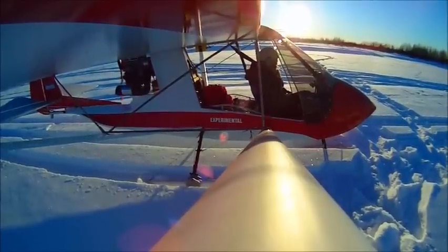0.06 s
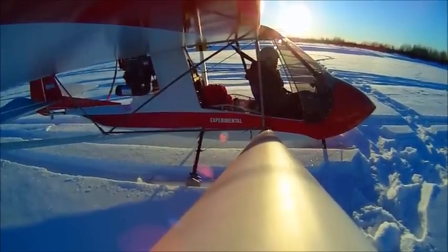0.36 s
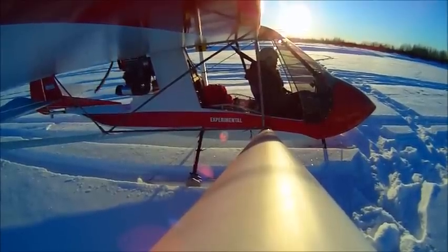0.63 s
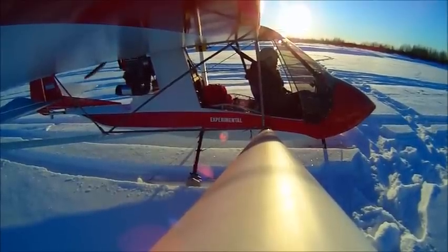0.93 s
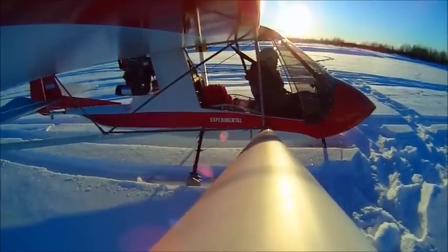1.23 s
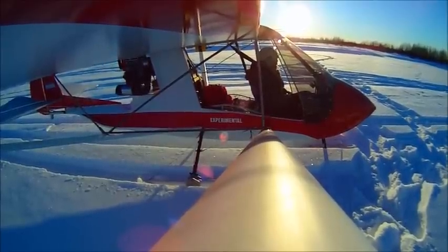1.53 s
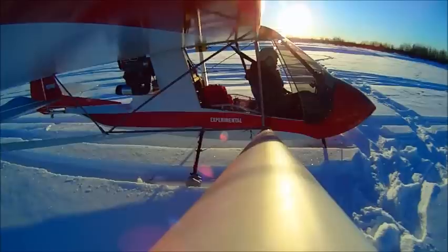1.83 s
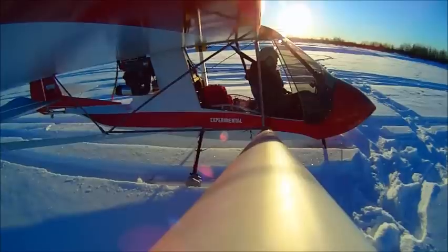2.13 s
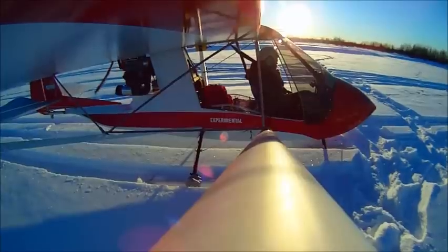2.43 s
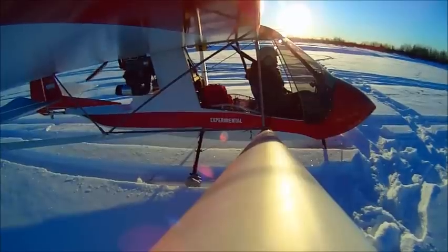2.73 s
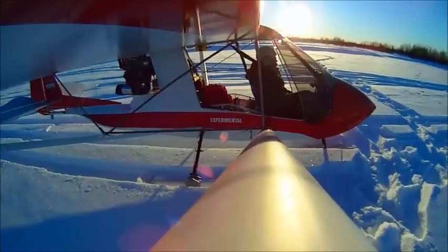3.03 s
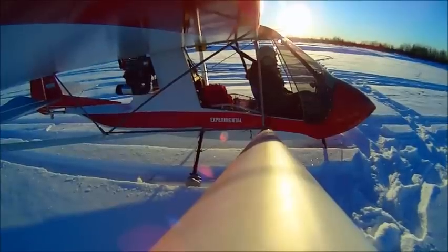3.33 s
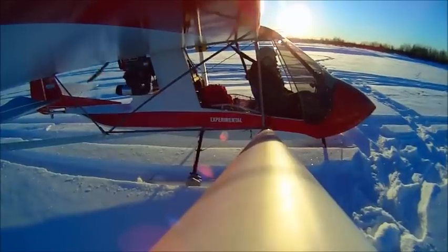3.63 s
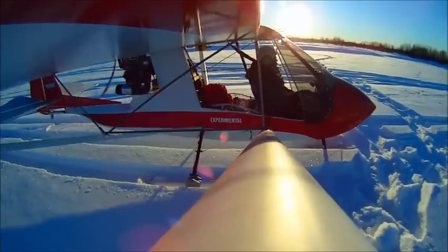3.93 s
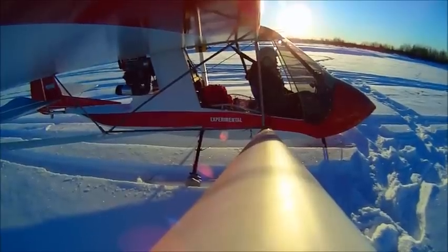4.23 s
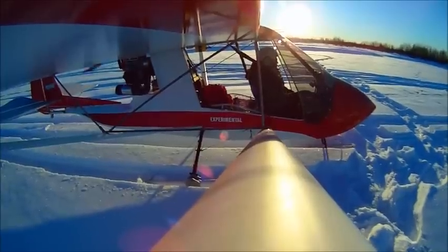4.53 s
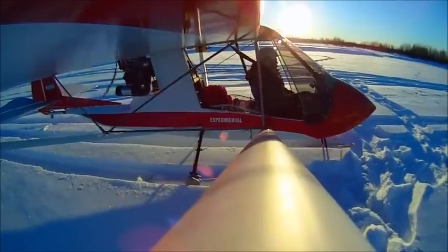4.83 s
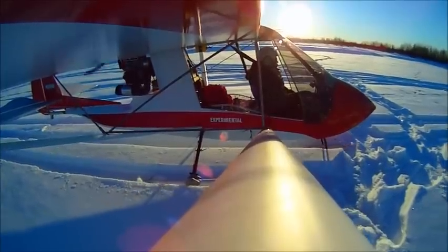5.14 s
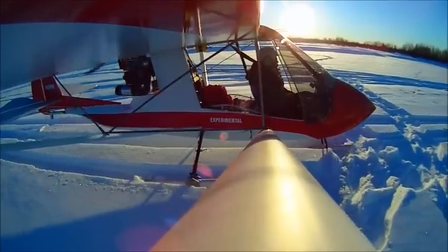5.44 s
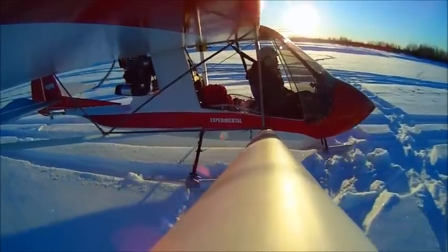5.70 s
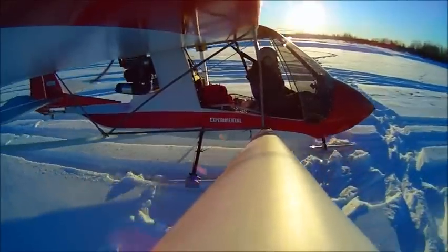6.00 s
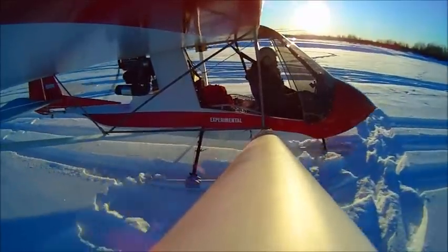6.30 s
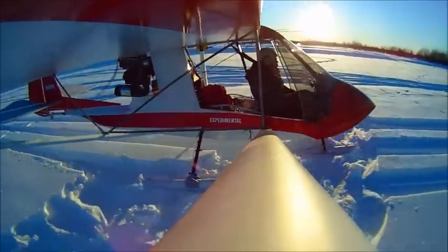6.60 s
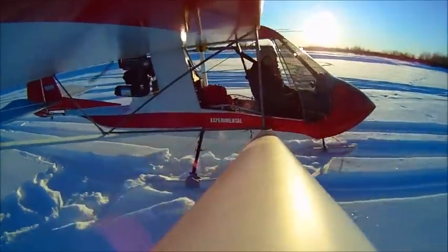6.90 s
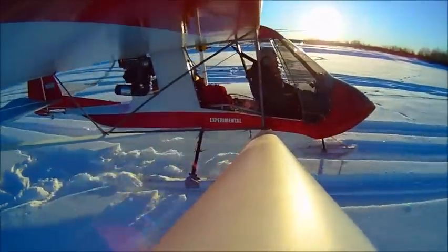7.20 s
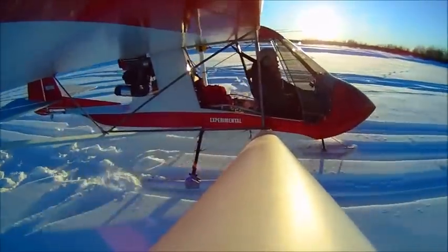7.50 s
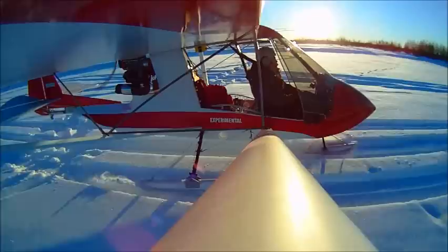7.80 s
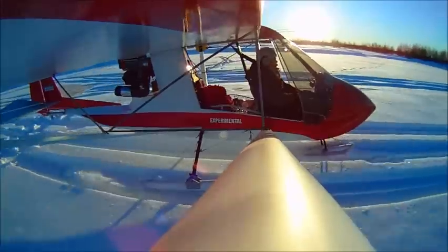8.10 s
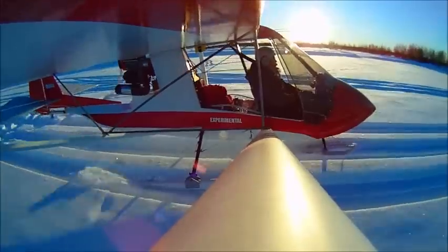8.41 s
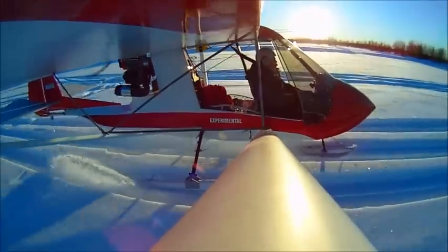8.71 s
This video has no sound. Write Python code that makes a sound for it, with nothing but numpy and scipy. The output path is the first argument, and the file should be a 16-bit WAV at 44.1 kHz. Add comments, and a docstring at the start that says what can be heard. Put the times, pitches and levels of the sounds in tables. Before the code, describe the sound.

Heard from a microphone on the wing strut, a small propeller plane ticks over with an uneven, tinny rattle. The throttle opens and the engine rises in pitch, pauses briefly, then rises again, with a raspy whine and swelling rush of air. Sharp metallic clacks and chatter break out on the way up. It ends in a loud, steady, buzzing drone that rings through the airframe.

```python
"""The two-stroke, two-cylinder engine of an ultralight on skis idles on snow, then revs up to full power.
It turns a two-blade propeller through a whining reduction drive, which makes the blades turn slower.
Engine and blades each give a family of overtones, over the rush of torn air. Everything rings in
the housing of a camera on the wing strut. A loose fitting clacks, and chatters when the shaft or
the blades shake the strut near 75 Hz."""
import sys
import numpy as np
from scipy import signal
from scipy.fft import rfft, irfft, next_fast_len
from scipy.io import wavfile
from scipy.ndimage import uniform_filter1d, map_coordinates

SR = 44100
rng = np.random.default_rng(int(sys.argv[2]) if len(sys.argv) > 2 else 0)


def transcribe(signal):
    """Save signal, clipped to [-1, 1], as a 16-bit WAV file at the path in sys.argv[1]."""
    frames = np.atleast_2d(signal).T
    limited = np.clip(frames, -1, 1)
    pcm = np.round(limited * 32767).astype(np.int16)
    wavfile.write(sys.argv[1], SR, pcm)


N = 385862

FULL_HZ, BLADES_PER_TURN = 101.3, 2 / 2.6  # shaft turns a second at full power; blade passes per turn
OPEN_S, OPEN_TAKES_S = 3.3, 0.56  # the throttle opens once and stays open
UNEQUAL_S, UNEQUAL_TAKES_S = 6.1, .3  # near full power the two cylinders stop firing alike

# Tone colour of the running engine, propeller and air: f/Hz, level/dB
RUN_COLOUR = [(35, -52), (60, -17), (190, -18), (347, -13), (399, -17.5), (564, -14.5), (1050, -10.5),
              (1450, -4), (2650, -18), (2910, -13.5), (5550, -18), (6530, -14.5), (7000, -21),
              (9900, -25.5), (15000, -54)]
# Tone colour of the loose fitting hitting the strut: f/Hz, level/dB
KNOCK_COLOUR = [(30, -70), (150, -40), (600, -19), (1050, -9), (1300, -3), (1480, 4.5), (1680, -3),
                (2170, -10), (2600, -7), (3600, -19), (5300, -17), (9000, -34), (11500, -52), (15000, -68)]


def amp(db):
    """Turn decibels into a gain."""
    return 10 ** (np.asarray(db) / 20)


def unit(x):
    """Scale x to an average (rms) strength of 1."""
    return x / np.sqrt(np.mean(x ** 2) + 1e-20)


def along(points, hz):
    """Read between (f/Hz, value) points on a log frequency axis."""
    f, v = np.transpose(points)
    return np.interp(np.log(hz + 1), np.log(f + 1), v)


def ramp(start, length):
    """Rise from 0 to 1 over length seconds."""
    return np.clip((np.arange(N) / SR - start) / length, 0, 1)


def wobble(rate):
    """A smooth random curve through `rate` new values a second."""
    at = np.arange(0, N + 32, 32) * rate / SR
    smooth = map_coordinates(rng.standard_normal(int(at[-1]) + 4), [at])
    return np.interp(np.arange(N) * rate / SR, at, smooth)


def filtered(x, response):
    """Multiply each frequency f in x by response(f)."""
    size = next_fast_len(N + SR // 2, True)
    return irfft(rfft(x, size) * response(np.fft.rfftfreq(size, 1 / SR)), size)[:N]


def coloured(x, points, size=4096):
    """Give x a tone colour (f/Hz, level/dB) that rings after each hit, never before it."""
    cepstrum = irfft(np.log(amp(along(points, np.fft.rfftfreq(size, 1 / SR)))))
    cepstrum[1:size // 2] *= 2
    cepstrum[size // 2 + 1:] = 0
    return signal.oaconvolve(x, irfft(np.exp(rfft(cepstrum))))[:N]


def patchy(x, depth_db, size=1024):
    """Swirling air makes each band of x swell and fade on its own."""
    bands = signal.stft(x, nperseg=size)[2]
    swell = uniform_filter1d(rng.standard_normal(bands.shape), size=5, axis=0)
    swell = uniform_filter1d(swell, size=14, axis=1)
    return signal.istft(bands * amp(depth_db * unit(swell)), nperseg=size)[1][:N]


def bursts(cycles, decay, scatter_db):
    """A level that jumps to a new height once a cycle, then fades; decay is in cycles."""
    which = np.floor(cycles - np.floor(cycles.min())).astype(int)
    heights = amp(scatter_db * rng.uniform(-1.6, 1, which.max() + 1))
    return heights[which] * np.exp(-(cycles % 1) / decay)


def strikes(cycles, colour, decay, scatter_db, scrape):
    """One hard blow and short scrape a cycle, smeared as bending waves run along the strut."""
    envelope = bursts(cycles, decay, scatter_db)
    blows = np.maximum(np.diff(envelope, prepend=envelope[0]), 0)
    contact = unit(blows) + scrape * unit(envelope * rng.standard_normal(N))
    spread = filtered(contact, lambda f: np.exp(-1j * np.sqrt(f)))  # treble travels fastest
    return unit(coloured(spread, colour))


def periodic(cycles, gains, size=8192):
    """A repeating wave with the given strength for each overtone."""
    cycle = irfft(gains * np.exp(2j * np.pi * rng.random(len(gains))), size) * size / np.sqrt(2)
    return np.interp(cycles % 1 * size, np.arange(size + 1), np.append(cycle, cycle[0]))


def stack(cycles, table):
    """A repeating wave from (multiple, level/dB) rows."""
    multiple, db = np.transpose(table)
    return periodic(cycles, np.bincount(multiple.astype(int), amp(db)))


def speed():
    """How many turns a second the engine's shaft makes."""
    # The shaft speeding up: t/s, turning rate/Hz
    shaft = [(0.0, 39.591), (3.37, 39.766), (3.73, 43.2), (4.1, 53.0), (4.23, 56.0), (4.39, 58.457),
             (4.86, 64.642), (5.24, 67.669), (5.51, 71.099), (5.69, 72.374), (6.1, 73.531), (6.31, 84.199),
             (6.51, 91.019), (6.71, 95.107), (7.0, 97.629), (7.29, 101.112), (7.55, 101.707),
             (8.18, 101.263), (8.75, 101.233)]
    return np.interp(np.arange(N) / SR, *np.transpose(shaft))


def octaves():
    """Shaft speed in octaves: 0 at full speed, -1 at half speed."""
    return np.log2(speed() / FULL_HZ)


def throttle():
    """0 at idle, 1 once the throttle is open."""
    return ramp(OPEN_S, OPEN_TAKES_S)


def idle(turns):
    """Uneven firings rattle the housing once a turn, over a hiss that beats four times a turn."""
    # Notes the housing rings at: f/Hz, width/Hz, relative level/dB
    housing = [(910, 25, -13), (1460, 45, .8), (1750, 40, -5.5), (2365, 35, -13), (3335, 50, -16),
               (3420, 20, -12), (4820, 170, -21)]
    # Tone colour of the idling engine's hiss: f/Hz, level/dB
    hiss_colour = [(60, -31), (125, -16), (140, -19), (215, -11), (300, -13), (380, -25), (480, -19),
                   (1050, -16), (1480, -0.5), (2000, -12), (2650, -20), (3350, -19.5), (3600, -33),
                   (6500, -31), (9500, -31), (12000, -48), (15000, -62)]
    idle_db, tight_hz = -54, 54.7
    level_db = idle_db - np.maximum(speed() - tight_hz, 0)  # 1 dB quieter per Hz above tight_hz
    shake = (.4 + bursts(turns, decay=.45, scatter_db=1.6)) * amp(.4 * wobble(30))
    notes = lambda f: sum(amp(db) * 1j * f * w / (c * c - f * f + 1j * f * w) for c, w, db in housing)
    ringing = filtered(rng.standard_normal(N), lambda f: notes(f) / (1 + (f / 8000) ** 4))
    rattle = unit(uniform_filter1d(shake, size=160) * ringing)
    beat = (1.3 + bursts(4 * turns, decay=0.71, scatter_db=4.5)) * amp(0.53 * wobble(45))
    swish = 1 + 0.14 * np.cos(2 * np.pi * turns * BLADES_PER_TURN)
    # tubes and fins add many narrow metallic peaks
    peaks_hz, peaks_db = np.linspace(0, SR / 2, N), 2 * wobble(45)
    peaks = lambda f: amp(np.clip(f / 4000, 0, 1) * np.interp(f, peaks_hz, peaks_db))
    metal = filtered(rng.standard_normal(N), peaks)
    hiss = unit(coloured(beat * swish * metal, hiss_colour))
    return amp(level_db) * (amp(-2.8) * rattle + amp(-3.0) * hiss)


def putter(turns):
    """The firings putter with a thin whine at idle, then make an exhaust note that climbs with speed."""
    # Overtones of the idling engine: multiple of the shaft rate, level/dB
    idle_tones = [(4, -82), (8, -85), (12, -80), (15, -82), (17, -82), (19, -80), (23, -78), (27, -78),
                  (31, -76), (36, -67), (54, -79), (84, -80), (86, -73.5), (102, -87), (108, -84),
                  (126, -87)]
    # Overtones of the exhaust at part throttle: multiple of the shaft rate, relative level/dB
    exhaust_tones = [(7, -64), (8, -62), (10, -64), (12, -60), (13, -56.5), (14, -64)]
    db_per_octave = 22
    idling = stack(turns + .0012 * wobble(12), idle_tones) * (1 - throttle()) ** 2
    part_throttle = throttle() * (1 - ramp(UNEQUAL_S, UNEQUAL_TAKES_S))
    exhaust = stack(turns + .004 * wobble(25), exhaust_tones) * amp(db_per_octave * octaves())
    return patchy(idling + part_throttle * exhaust, depth_db=1.5)


def backlash(turns):
    """With no load on it, the slack in the drive ticks once a blade pass."""
    colour = [(500, -14), (2500, -7), (4900, -4.5), (7500, -4), (10500, -9), (13000, -24), (15000, -50)]
    ticks = strikes(turns * BLADES_PER_TURN - .55, colour, decay=0.26, scatter_db=3, scrape=4)
    return amp(-75) * (1 - throttle()) * ticks


def overtones(cycles, table, full_hz, rest_db, count, odd=1):
    """Overtones flare up in turn as they slide through the pitches the airframe rings at."""
    multiple, db = np.transpose(table)
    k = np.arange(count)
    strength_db = rest_db + rng.uniform(-1.5, 3.1, count)  # for overtones not in the table
    strength_db[multiple.astype(int)] = db - along(RUN_COLOUR, multiple * full_hz)
    source_share = .35  # the rest of each overtone's strength comes from the airframe
    gains = (k >= multiple[0]) * amp(source_share * strength_db)
    wave = periodic(cycles, gains * (1 - k % 2)) + odd * periodic(cycles, gains * (k % 2))
    rounded = lambda u: u - np.sin(2 * np.pi * u) / (2 * np.pi)  # the peaks have round tops
    frame_db = lambda f: (1 - source_share) * np.interp(rounded(f / full_hz), k, strength_db)
    return filtered(wave, lambda f: amp(frame_db(f) + along(RUN_COLOUR, f)))


def drone(turns):
    """Engine and propeller drone louder with speed; the engine runs unevenly until it is under load."""
    # Engine overtones at full power: multiple of the shaft rate, relative level/dB
    engine_tones = [(6, -59.5), (7, -60), (8, -61), (9, -59), (10, -58), (11, -56), (12, -58), (14, -54),
                    (15, -60), (16, -58), (17, -49), (18, -54), (19, -61), (20, -54), (21, -59), (22, -54),
                    (23, -58), (24, -57), (26, -62), (27, -60), (28, -51), (29, -60), (32, -64), (33, -55),
                    (34, -57), (37, -60), (39, -59), (46, -62), (47, -59), (55, -61), (58, -61), (61, -62),
                    (62, -45), (63, -62), (64, -61), (65, -58), (66, -56), (70, -62), (72, -64), (74, -61),
                    (82, -57), (90, -65), (96, -65), (98, -66), (105, -69), (109, -67), (115, -69),
                    (117, -71)]
    # Propeller overtones at full power: multiple of the blade rate, level/dB
    prop_tones = [(8, -60), (9, -66), (10, -58), (11, -58), (12, -59), (15, -51), (16, -49), (17, -44),
                  (18, -41), (19, -45), (20, -50), (21, -51), (22, -45), (23, -53), (25, -49), (27, -54),
                  (28, -58), (29, -53), (30, -53), (31, -52), (32, -55), (38, -54)]
    engine_db, prop_db = 1 + 19.5 * octaves(), 26.5 * octaves()
    unsteady = (.0004 + .009 * (1 - ramp(OPEN_S, .6))) * wobble(25)
    odd = amp(-13 * (1 - ramp(UNEQUAL_S, UNEQUAL_TAKES_S)))  # unequal cylinders fill in odd multiples
    engine = overtones(turns + unsteady, engine_tones, FULL_HZ, rest_db=-48.5, count=150, odd=odd)
    passes = turns * BLADES_PER_TURN + 0.0019 * wobble(30)
    prop = overtones(passes, prop_tones, FULL_HZ * BLADES_PER_TURN, rest_db=-53.5, count=60)
    return amp(engine_db) * patchy(engine, depth_db=.9) + amp(prop_db) * patchy(prop, depth_db=2.2)


def tone(turns, name, full_db, db_per_octave, waver_db):
    """One pure tone tied to the shaft: it grows with speed and swells where the airframe rings along."""
    # Pitches of the turning parts: tone name -> multiple of the shaft rate
    ratios = {"shaft": 1, "firing": 2, "third": 3, "fourth": 4, "fifth": 5, "sixth": 6, "blade":
              BLADES_PER_TURN, "second blade": 2 * BLADES_PER_TURN, "third blade": 3 * BLADES_PER_TURN,
              "fourth blade": 4 * BLADES_PER_TURN, "sixth blade": 6 * BLADES_PER_TURN, "shaft plus blade": 1
              + BLADES_PER_TURN, "firing plus blade": 2 + BLADES_PER_TURN, "low whine": 24 *
              BLADES_PER_TURN, "middle whine": 30, "high whine": 40}
    # Airframe resonances that a tone slides through: tone name, f/Hz, width/Hz, lift/dB
    resonances = [("shaft", 47, 6.7, 12), ("shaft", 74.3, 2.6, 16.7), ("shaft", 82.7, 7.6, 14.5),
                  ("shaft", 102, 4, 7.3), ("firing", 80, 7.7, 22.7), ("firing", 148, 3.1, 12),
                  ("blade", 45, 7.8, 15), ("blade", 77, 8.4, 12), ("second blade", 95, 9.7, 15),
                  ("second blade", 147, 1.3, 4.5), ("shaft plus blade", 120.8, 6, 22),
                  ("third", 221, 3.1, 20.7), ("fourth", 167, 6.6, 30.5), ("fourth", 316, 40, 8.5),
                  ("sixth blade", 230, 17, 15), ("high whine", 4055, 60, 6), ("fifth", 275, 22, 23),
                  ("sixth", 238, 10, 12), ("sixth", 315, 22, 15), ("third", 120, 8, 8.7),
                  ("firing", 100, 14, 6.6), ("shaft plus blade", 95, 10, 8)]
    hz = ratios[name] * speed()
    lift_db = sum(db * np.exp(-((hz - centre) / width) ** 2)
                  for driver, centre, width, db in resonances if driver == name)
    level_db = full_db + db_per_octave * octaves() + lift_db + waver_db * wobble(14)
    return np.sqrt(2) * amp(level_db) * np.sin(2 * np.pi * ratios[name] * turns)


def throb(turns):
    """The deepest tones of engine and propeller shake the strut, roughened by uneven firings."""
    # Deep hums: tone name, base level at full speed/dB, growth/dB per octave of speed
    hums = [("shaft", -67, 11), ("firing", -61, 17.2), ("third", -71.5, 12.6), ("fourth", -55, 30.8),
            ("fifth", -66.5, 26), ("sixth", -75, 9.4), ("blade", -71.5, 16.4), ("second blade", -59.5, 31),
            ("third blade", -62.5, 39), ("fourth blade", -63, 42), ("sixth blade", -59.5, 25),
            ("shaft plus blade", -68, 17.3), ("firing plus blade", -65, 15)]
    stumble = .65 * (1 - ramp(start=4.9, length=.5))  # smooths out as the engine takes load
    rough = throttle() * (.22 + stumble)
    hum = sum(tone(turns, *row, waver_db=1.0) * (1 + rough * wobble(60)) for row in hums)
    return hum / np.sqrt(1 + rough ** 2)


def whines(turns):
    """The reduction drive whines under load, its lowest note with a rasp."""
    # Drive notes, low to high: tone name, base level at full speed/dB, growth/dB per octave of speed
    notes = [("low whine", -46, 19.5), ("middle whine", -60.5, 11), ("high whine", -60.5, 26)]
    low, *upper = (tone(turns, *row, waver_db=1.5) for row in notes)
    grip = ramp(start=3.9, length=.12)  # the drive takes up load
    ease = amp(-8 * ramp(start=7.7, length=0.54))  # the aircraft gets moving
    rasp = 1 + .45 * wobble(70)
    return amp(-14 * (1 - throttle())) * (grip * ease * rasp * low + sum(upper))


def buzz(turns, count=120):
    """Two gritty firings a turn make bright overtones that climb through the metal's ringing bands."""
    # Ringing bands of the engine's metal: f/Hz, level/dB
    metal_colour = [(1200, -30), (2100, -8), (2380, 5), (2520, -3), (2700, -3), (3020, 2), (3300, -2),
                    (3550, 1), (3720, -3), (4000, 3), (4200, -9), (4580, 0), (4850, -4), (5100, -5),
                    (5500, 2), (5850, -4), (6180, 2), (6550, -4), (6950, -3), (7300, -16), (9500, -15),
                    (12000, -26), (15000, -40)]
    # Strength of the buzz at each shaft speed: turning rate/Hz, level/dB
    strength = [(40, -76), (46, -61), (55, -58.5), (62, -55), (67, -53.5), (72, -54), (82, -47.5),
                (90, -44), (97, -45.5), (101, -56)]
    firings = unit(periodic(2 * turns + .001 * wobble(60), amp(rng.uniform(-1.5, 1.5, count))))
    grit = unit((2 + bursts(2 * turns, decay=.4, scatter_db=2)) * rng.standard_normal(N))
    ring = lambda x: unit(filtered(x, lambda f: amp(along(metal_colour, f))))
    return amp(along(strength, speed())) * unit(patchy(ring(firings), depth_db=2.0) + .47 * ring(grit))


def wash(turns):
    """Air torn by the blades pulses with each pass and grows louder with speed."""
    # Low, middle and high rush of air: idle level/dB, full-speed level/dB, growth/dB per octave of speed
    bands = [(-79, -54, 16), (-66, -38.7, 18.5), (-72, -44, 19)]
    opened = throttle()
    low_db, mid_db, high_db = ((1 - opened) * idle_db + opened * (full_db + growth * octaves())
                               for idle_db, full_db, growth in bands)
    pulse = 1 + 0.028 * np.cos(2 * np.pi * turns * BLADES_PER_TURN)
    noise = pulse * amp(1.2 * wobble(150)) * rng.standard_normal(N)
    air = patchy(coloured(noise, RUN_COLOUR), depth_db=1.0)
    below = lambda f, hz: 1 / (1 + (f / hz) ** 6)
    low = unit(filtered(air, lambda f: below(f, hz=880)))
    middle = unit(filtered(air, lambda f: below(f, hz=3000) - below(f, hz=836)))
    high = unit(filtered(air, lambda f: 1 - below(f, hz=3380)))
    return amp(low_db) * low + amp(mid_db) * middle + amp(high_db) * high


def airframe(x):
    """Tubes and panels pass some bands to the camera and swallow others."""
    # Bands the airframe lifts or swallows: f/Hz, width/Hz, gain/dB
    bands = [(1100, 200, -2), (1500, 110, 1.5), (2140, 90, -5), (2370, 80, 5), (2630, 80, -6),
             (3990, 80, 3), (4200, 170, -3), (5760, 90, -4), (7350, 300, -3)]
    gain_db = lambda f: sum(db * np.exp(-((f - hz) / width) ** 2) for hz, width, db in bands)
    return filtered(x, lambda f: amp(gain_db(f)))


def gulps():
    """The engine catches on every other turn as the throttle opens, each time with a hiss."""
    # Hissing gulps: t/s, relative level/dB
    catches = [(3.587, -53.5), (3.636, -50), (3.683, -49.5), (3.73, -47.5), (3.774, -51), (3.818, -51.5),
               (3.861, -50)]
    t = np.arange(N) / SR
    envelope = sum(amp(db) * (t > s) * np.exp(-np.abs(t - s) / 0.026) for s, db in catches)
    colour = [(30, -22), (120, -1), (200, -3), (320, 0), (450, -13), (1500, 2.0), (3000, -6.0),
              (6500, -10), (10000, -19), (15000, -54)]
    return amp(2) * envelope * unit(coloured(rng.standard_normal(N), colour))


def clacks():
    """Jolts throw the loose fitting against the strut."""
    # Single hard clacks: t/s, peak level before the ringing is added/dB, dulled above f/Hz
    jolts = [(4.7387, -33, 1500), (4.7417, -31, 2000), (5.7253, -26, 1900), (5.8222, -21.5, 2500),
             (5.8502, -18.5, 1900), (6.636, -22, 6000), (6.6798, -18, 8000), (6.7216, -15.3, 8000),
             (6.765, -20, 6000), (6.778, -20, 6000), (6.792, -21, 5000), (6.8048, -17, 8000),
             (6.8185, -17.5, 8000), (6.845, -22, 5000), (6.8583, -15.3, 8000), (6.9915, -20.5, 8000)]
    t = np.arange(SR // 50) / SR
    knocks = np.zeros(N)
    for s, db, dull_hz in jolts:
        crack = rng.standard_normal(len(t)) * np.exp(-t / .0011)
        soften = signal.butter(2, dull_hz, fs=SR)
        knock = coloured(signal.lfilter(*soften, crack), KNOCK_COLOUR)
        knocks[round(s * SR):][:len(knock)] += amp(db) * knock / np.abs(knock).max()
    return knocks + .4 * fitting_note(knocks)


def fitting_note(x, ring_hz=2630, width_hz=340):
    """A hard knock makes the fitting ring at its own note."""
    return 2.4 * filtered(x, lambda f: np.exp(-((f - ring_hz) / width_hz) ** 2))


def bouts(rows, attack_s=0.097, release_s=0.12):
    """Each bout of chatter builds up, holds and lets go; overlapping bouts add."""
    return sum(amp(db) * (ramp(start, attack_s) - ramp(end, release_s)) for start, end, db in rows)


def chatter(turns):
    """The shaken fitting knocks between its two stops each shaft turn, or is nudged each blade pass."""
    # Bouts of chatter in step with the shaft: start/s, end/s, relative level/dB
    shaft_bouts = [(5.76, 6.115, -32.8), (5.96, 6.08, -39)]
    # Bouts hard enough to ring the fitting's own note: start/s, end/s, relative level/dB
    hard_bouts = [(5.86, 6.08, -34.5), (5.96, 6.08, -39.5)]
    # Bouts of chatter in step with the blades: start/s, end/s, level/dB
    blade_bouts = [(4.95, 6.5, -50.5), (5.62, 6.2, -46), (6.55, 8.75, -35.5), (7.8, 8.0, -39)]
    # Tone colour of the fitting hitting its other stop: f/Hz, level/dB
    tick_colour = [(30, -60), (400, -16.5), (1400, 6.5), (2200, 1), (3500, -22), (5200, -2.5), (6800, -11),
                   (10000, -33), (15000, -60)]
    loose = turns + .011 * wobble(70)  # never quite on time
    knock = strikes(loose - .84, KNOCK_COLOUR, decay=0.17, scatter_db=.6, scrape=1)
    tick = strikes(loose - .16, tick_colour, decay=0.1, scatter_db=1, scrape=.7)  # a third of a turn on
    soft_colour = [(30, -70), (200, -34.0), (800, -12.5), (1200, -7.5), (1450, 5.0), (1850, -4.0),
                   (2200, -7.5), (2800, -10), (3600, -19.0), (6000, -18.0), (14000, -43.5)]
    nudge = strikes(turns * BLADES_PER_TURN - .71, soft_colour, decay=0.15, scatter_db=0, scrape=4.3)
    rattle = bouts(shaft_bouts) * (amp(-1.5) * knock + amp(-3.5) * tick)
    return rattle + bouts(hard_bouts) * fitting_note(knock) + bouts(blade_bouts) * nudge


def scene():
    """Add up the sounds; all but the gulps and clacks keep time with the shaft."""
    turns = np.cumsum(speed()) / SR
    tones = drone(turns) + putter(turns) + throb(turns) + whines(turns)
    machine = tones + airframe(buzz(turns) + wash(turns)) + gulps() + idle(turns) + backlash(turns)
    return (machine + chatter(turns) + clacks())[None]


def record(dry):
    """The camera picks up nothing above its highest frequency."""
    top_hz = 15250
    return filtered(dry[0], lambda hz: hz < top_hz)[None]


dry = scene()
out = record(dry)
transcribe(out)
```